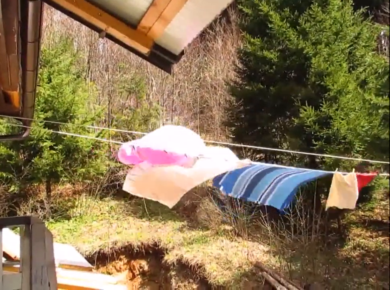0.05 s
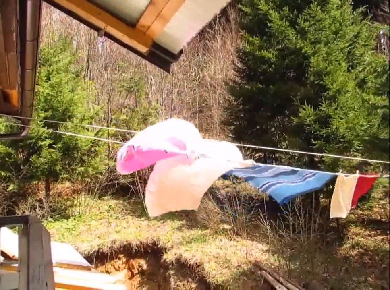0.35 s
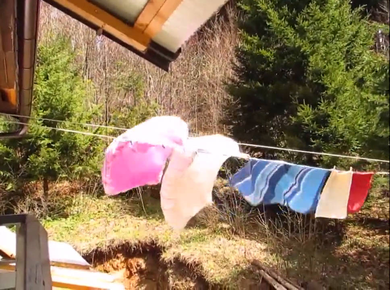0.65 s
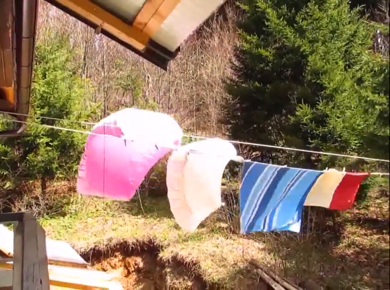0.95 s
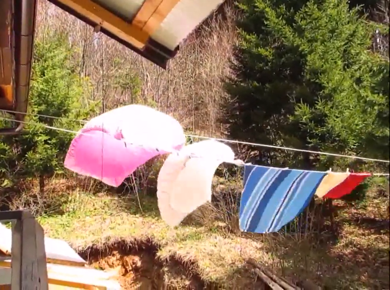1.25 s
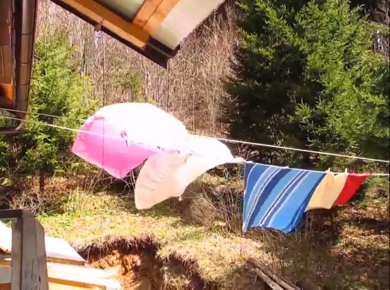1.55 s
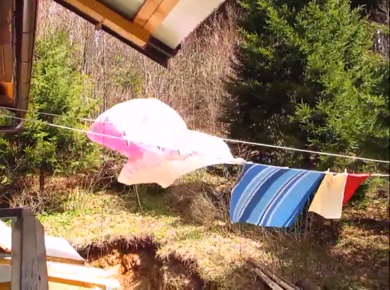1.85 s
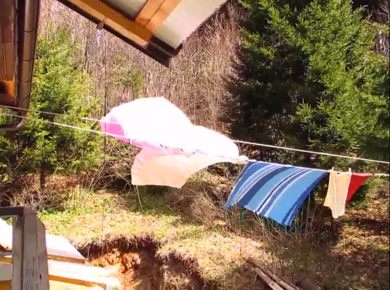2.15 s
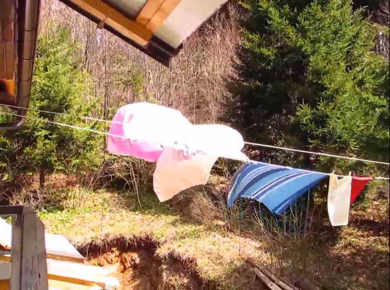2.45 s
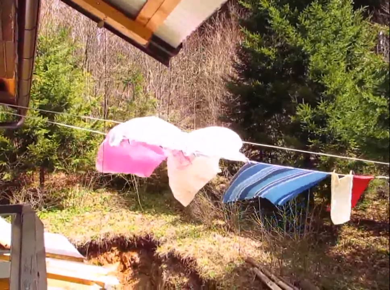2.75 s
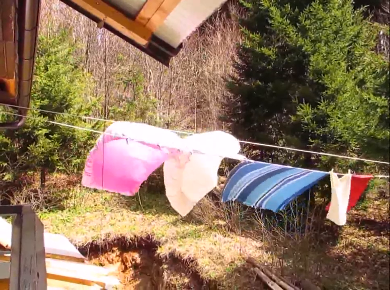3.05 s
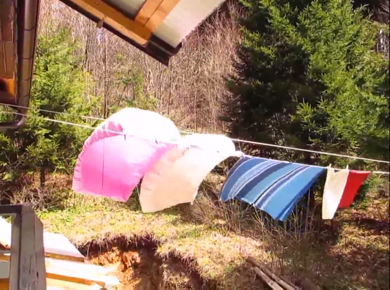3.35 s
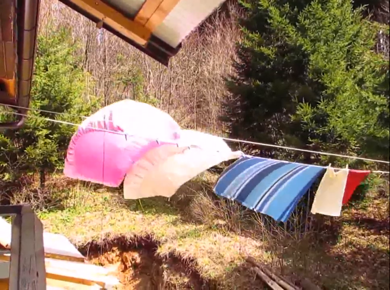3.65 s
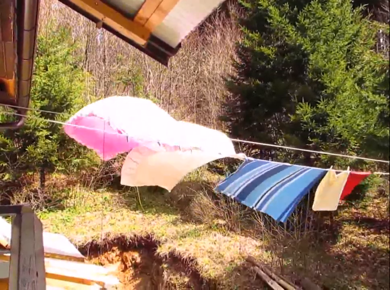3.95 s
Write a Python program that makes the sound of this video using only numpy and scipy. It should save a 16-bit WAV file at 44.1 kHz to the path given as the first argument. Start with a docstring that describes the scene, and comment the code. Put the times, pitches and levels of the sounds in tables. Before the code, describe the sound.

Wind buffets the microphone in uneven clusters of low thumps and rumble, hardest around the middle and at the very end. Beyond an open yard, trees rush softly and steadily while small birds whistle faintly far off.

```python
"""Wind buffeting a stereo microphone in a yard at the edge of a wood.
Eddies strike the ports in clusters of hard thumps, over a restless low rumble of turbulence.
Beyond the yard the crowns of the trees roar steadily and their needles hiss.
Far off, small birds whistle and the trunks echo them. The microphone adds a faint electrical whine."""
import sys
import numpy as np
from scipy import signal
from scipy.io import wavfile

SR = 44100
rng = np.random.default_rng(int(sys.argv[2]) if len(sys.argv) > 2 else 0)


def wav_record(signal):
    """Record a signal, one row per channel, as 16-bit PCM in the file named by sys.argv[1]."""
    frames = np.transpose(np.atleast_2d(signal))
    bounded = np.clip(frames, -1, 1)
    # unit amplitude maps onto the largest positive 16-bit level
    quanta = np.round(bounded * 32767).astype(np.int16)
    wavfile.write(sys.argv[1], SR, quanta)


N = 176400
T = np.arange(N) / SR
CUTOFF_HZ = 15900   # top of the microphone's range


# Eddies right on the microphone: peak_s, relative_level_db, pitch_hz, length_s, right_port_lag_s
EDDY_HITS = [(0.095, -26.5, 106.7, 0.054, -0.0001), (0.133, -19.5, 93, 0.015, 0.0003),
             (0.239, -21.5, 98.8, 0.049, -0.0003), (0.599, -21, 95, 0.03, -0.0004),
             (0.624, -20, 110, 0.0073, -0.0002), (0.656, -17, 102.5, 0.04, -0.0009),
             (0.677, -19, 92, 0.013, -0.0003), (0.703, -23.5, 96, 0.0061, -0.0018),
             (0.717, -26, 85, 0.0072, 0.0008), (0.774, -34, 109, 0.012, -0.001),
             (0.85, -17, 112.6, 0.015, -0.0008), (1.175, -27, 119, 0.022, 0.0005),
             (1.285, -11.5, 107, 0.014, 0.0011), (1.338, -18, 104, 0.028, -0.0009),
             (1.382, -24, 102, 0.0048, 0.0007), (1.405, -11, 121, 0.0038, -0.001),
             (1.43, -11.5, 162, 0.02, -0.0011), (1.518, -43, 110, 0.02, 0.0001),
             (1.579, -20.5, 178, 0.021, 0.0012), (1.629, -20, 96.3, 0.029, 0.0003),
             (1.742, -23.5, 132, 0.027, 0.0013), (2.033, -13, 102, 0.009, 0.0001),
             (2.088, -11, 126, 0.016, -0.0007), (2.14, -2.5, 210, 0.011, -0.0012),
             (2.158, -4, 179, 0.0071, -0.0015), (2.193, -13.5, 126.6, 0.038, -0.0015),
             (2.211, -13.5, 113.2, 0.017, -0.0007), (2.262, -19, 123, 0.0075, -0.0014),
             (2.289, -13.5, 282, 0.016, 0.0012), (2.308, -14, 208, 0.0077, 0.0012),
             (2.359, -16.5, 121, 0.013, -0.0016), (2.752, -24, 139, 0.015, -0.0011),
             (2.794, -29.5, 96.7, 0.052, -0.0002), (2.923, -31.5, 122, 0.016, 0.0002),
             (2.943, -26.5, 108, 0.03, -0.0011), (3.005, -27.5, 133, 0.032, 0.0005),
             (3.128, -15.5, 112.5, 0.037, -0.0001), (3.141, -21.5, 190, 0.015, -0.0009),
             (3.289, -12.5, 139, 0.02, -0.0011), (3.349, -16.5, 99, 0.021, -0.0005),
             (3.38, -33, 105, 0.0094, -0.0001), (3.418, -22, 92, 0.018, -0.0012),
             (3.493, -21, 110, 0.0068, -0.0016), (3.551, -21.5, 117.4, 0.051, -0.0011),
             (3.63, -24, 96.5, 0.024, -0.0), (3.707, -27, 86, 0.041, -0.0002),
             (3.8, -22, 82, 0.019, -0.0005), (3.927, 1, 124.4, 0.013, 0.0009),
             (3.947, -10, 133, 0.012, 0.0012), (3.985, -14.5, 140, 0.03, 0.0016)]

def buffets(gain_db=-3):
    """Each eddy sweeps over one port and, a moment later, over the other."""
    half = SR // 12
    t = np.arange(-half, half) / SR
    out = np.zeros((2, N + SR))
    for peak_s, level_db, pitch_hz, length_s, lag_s in EDDY_HITS:
        pressure = from_db(level_db + gain_db) * eddy(t, pitch_hz, length_s)
        left = np.interp(t + lag_s / 2, t, pressure)
        right = np.interp(t - lag_s / 2, t, pressure)
        at = int(peak_s * SR)
        out[:, at:at + 2 * half] += [left, right]
    return out[:, half:half + N]


def eddy(t, pitch_hz, length_s, push_hz=62.8, push_s=0.026, whirl_top_hz=597):
    """A few uneven pressure swings on a slow push of air, ragged with small whirls."""
    window = swell(t, length_s)
    wander = unit_rms(band(rng.standard_normal(len(t)), pitch_hz / 5, pitch_hz))
    wander -= np.average(wander, weights=window ** 2)
    turns = np.cumsum(pitch_hz * np.exp(0.29 * wander)) / SR
    phase = rng.random()
    swings = window * np.sin(2 * np.pi * (phase + turns - turns[len(t) // 2]))
    push_gain = from_db(3) * (push_hz / pitch_hz) ** 1.8   # faster eddies push less
    push = push_gain * swell(t, push_s) * np.sin(2 * np.pi * (phase + push_hz * t))
    whirls = band(rng.standard_normal(len(t)), 1.04 * pitch_hz, 2.69 * pitch_hz)
    whirls = signal.sosfilt(signal.butter(6, whirl_top_hz, fs=SR, output="sos"), whirls)
    whirls = unit_rms(window * whirls) * np.sqrt(np.mean(window ** 2))
    return swings + push + from_db(-16) * whirls


# Turbulence at the microphone, between the buffets: time_s, relative_level_db
RUMBLE_LEVEL = [(0.0, -29), (0.13, -46), (0.32, -47.5), (0.6, -57), (0.75, -37), (0.95, -45), (1.21, -48),
                (1.41, -23.5), (1.49, -30.5), (1.79, -45), (2.04, -35), (2.19, -28), (2.35, -38.5),
                (2.57, -43), (2.85, -39), (3.19, -41), (3.33, -26), (3.45, -38.5), (3.73, -37), (4.0, -38)]
# Its tone, heavy in the bass: frequency_hz, relative_density_db
RUMBLE_SPECTRUM = [(25, -24), (45, 0), (70, 1.5), (105, -1), (160, -9.5), (250, -19.5), (400, -30),
                   (800, -37)]
# How alike it is at the left and right ports: frequency_hz, correlation
RUMBLE_CORRELATION = [(50, 1), (100, 0.95), (200, 0.0035), (400, 0.18)]

def rumble(gain_db=2.5, lumps_db=5, lumps_hz=25.5):
    """Lumpy low turbulence on the microphone ports."""
    noise = air_noise(RUMBLE_SPECTRUM, RUMBLE_CORRELATION, low_hz=22.46, high_hz=810, bands=10,
                      flicker_db=0.5, flicker_hz=4.5)
    lumps = from_db(lumps_db * drift(lumps_hz))
    return from_db(gain_db + in_time(RUMBLE_LEVEL)) * unit_rms(noise * lumps)


# Wind in the crowns, heard from the yard: time_s, relative_level_db
ROAR_LEVEL = [(0.0, -44), (0.65, -41.5), (0.96, -40.5), (1.85, -40.5), (2.22, -42), (3.12, -41),
              (3.6, -40.5), (4.0, -41.5)]
# Tone of the crowns at that distance: frequency_hz, relative_density_db
ROAR_SPECTRUM = [(170, -1), (300, 1.5), (450, 1.5), (650, 2.5), (900, 4), (1200, 0.5), (1700, -5),
                 (2400, -13), (3500, -18), (4800, -27)]
# Wind through the needles: time_s, relative_level_db
HISS_LEVEL = [(0.0, -72), (0.22, -71.5), (1.15, -67), (2.04, -67.5), (3.72, -67), (4.0, -69)]
# Tone of the needles: frequency_hz, relative_density_db
HISS_SPECTRUM = [(4800, -8.5), (6500, -9), (9000, -9.5), (12000, -14.5), (15500, -19)]
# How alike the trees sound left and right: frequency_hz, correlation
TREES_CORRELATION = [(150, .7), (380, 0.82), (700, 0.85), (1300, 0.89), (2400, 0.93), (4400, 0.74),
                     (8000, 0.14), (15000, 0.2)]
# Where they sit in front of the microphone: frequency_hz, left_minus_right_db
TREES_BALANCE = [(200, -2), (640, 3.5), (1400, 0.9), (3100, 0.4), (6800, 1.4), (15000, 0)]

def trees(roar_db=-0.5, hiss_db=4, split_hz=4766):
    """Broad roar of the crowns and fine hiss of the needles, both swelling with the wind."""
    roar = air_noise(ROAR_SPECTRUM, TREES_CORRELATION, low_hz=153.4, high_hz=split_hz, bands=14,
                     flicker_db=0.61, flicker_hz=2.9, balance=TREES_BALANCE)
    hiss = air_noise(HISS_SPECTRUM, TREES_CORRELATION, low_hz=split_hz, high_hz=CUTOFF_HZ, bands=5,
                     flicker_db=0.5, flicker_hz=9, balance=TREES_BALANCE)
    roar *= from_db(roar_db + in_time(ROAR_LEVEL))
    hiss *= from_db(hiss_db + in_time(HISS_LEVEL))
    return roar + hiss


# Small birds far off in the wood:
# start_s, length_s, start_pitch_hz, end_pitch_hz, relative_level_db, warble_depth_hz
BIRD_NOTES = [(0.782, 0.16, 3700, 3830, -57.5, 330), (.85, 0.072, 7050, 7200, -63, 100),
              (.936, 0.059, 7545, 7535, -56, 18), (0.981, 0.14, 6850, 6840, -54.5, 150),
              (1.1, 0.11, 7270, 7230, -51, 18), (1.126, 0.1, 7080, 6880, -68, 130),
              (1.244, 0.036, 4050, 3934, -51.5, 39), (1.299, .06, 4043, 3850, -50.5, 14),
              (1.463, .04, 3970, 4020, -59, 13), (1.72, 0.16, 8310, 8080, -59, 51),
              (1.904, 0.18, 8030, 7880, -55.5, 25), (2.041, 0.083, 8040, 8080, -58, 140),
              (2.165, 0.077, 8280, 8390, -57.5, 36), (2.259, 0.12, 4040, 4030, -51, 62),
              (2.341, 0.22, 3740, 3610, -50.5, 400), (2.37, .16, 4140, 3960, -58, 87),
              (2.45, 0.16, 5040, 5290, -59, 283), (2.61, .15, 4520, 4580, -58, 140),
              (2.66, 0.094, 4010, 3970, -53, 170)]

def birds(direct_db=-5.5, echo_db=-3.5, wood_t60_s=1):
    """Thin warbling whistles, smeared by echoes among the trunks on their way to the yard."""
    song = np.zeros(N)
    warble = drift(rate_hz=150)
    for start_s, length_s, start_hz, end_hz, level_db, depth_hz in BIRD_NOTES:
        on = (T >= start_s) & (T < start_s + length_s)
        progress = (T[on] - start_s) / length_s
        pitch_hz = start_hz + (end_hz - start_hz) * progress + depth_hz * warble[on]
        envelope = from_db(level_db) * np.sqrt(2 * np.sin(np.pi * progress))
        song[on] += envelope * np.sin(2 * np.pi * np.cumsum(pitch_hz) / SR)
    trunks = rng.standard_normal((2, SR)) * from_db(-60 * T[:SR] / wood_t60_s)
    echo = signal.fftconvolve(song[None], unit_rms(trunks) / np.sqrt(SR), axes=1)[:, :N]
    return from_db(direct_db) * song + from_db(echo_db) * echo


def air_noise(spectrum, correlation, low_hz, high_hz, bands, flicker_db, flicker_hz, balance=None):
    """Rushing air: bands of stereo noise, each with its own level, flicker, width and side; rms 1."""
    edges = np.geomspace(low_hz, high_hz, bands + 1)
    flip = np.array([[1], [-1]])   # left up, right down
    white = rng.standard_normal((2, 2, N))
    out = np.zeros((2, N))
    for k, (low, high) in enumerate(zip(edges, edges[1:])):
        mid, side = band(white[k % 2], low, high)   # neighbouring bands take independent noise
        centre_hz = np.sqrt(low * high)
        alike = np.clip(at_hz(correlation, centre_hz), -1, 1)
        stereo = np.sqrt(1 + alike) * mid + np.sqrt(1 - alike) * side * flip
        pan = from_db(flip * at_hz(balance, centre_hz) / 2) if balance else 1
        gain = from_db(at_hz(spectrum, centre_hz) + flicker_db * drift(flicker_hz))
        out += pan * gain * stereo
    return unit_rms(out)


def drift(rate_hz):
    """A smooth random curve of rms about 1, moving mostly slower than rate_hz."""
    hop, settle = 40, 2000   # samples per step; steps for the filter to settle
    pole = np.exp(-2 * np.pi * rate_hz * hop / SR)
    white = rng.standard_normal(N // hop + settle + 2)
    slow = signal.lfilter([1], [1, -2 * pole, pole * pole], white)[settle:]
    return np.interp(np.arange(N) / hop, np.arange(len(slow)), unit_rms(slow))


def swell(t, length_s):
    """A smooth rise and fall around time zero, about length_s wide at half height."""
    return 1 / np.cosh(np.clip(2.5 * t / length_s, -20, 20))


def band(x, low_hz, high_hz):
    """Gentle band-pass."""
    edges = [max(low_hz, 10), min(high_hz, 0.45 * SR)]
    return signal.sosfilt(signal.butter(2, edges, "band", fs=SR, output="sos"), x)


def in_time(rows):
    """Read a table at every sample."""
    return np.interp(T, *np.transpose(rows))


def at_hz(rows, hz):
    """Read a table on a log-frequency axis."""
    frequencies, values = np.transpose(rows)
    return np.interp(np.log(hz), np.log(frequencies), values)


def from_db(db):
    """Decibels to gain."""
    return 10 ** (np.asarray(db) / 20)


def unit_rms(x):
    """Scale to unit power."""
    return x / np.sqrt(np.mean(x ** 2) + 1e-20)


def scene():
    """The wood as heard from the yard, with the wind on the microphone in front of it all."""
    return trees() + birds() + rumble() + buffets()


def record(dry, low_cut_hz=32, whine_hz=15734, whine_db=-74):
    """The microphone sheds deep bass, adds a faint whine, overloads at full scale and cuts the top."""
    x = signal.sosfilt(signal.butter(2, low_cut_hz, "high", fs=SR, output="sos"), dry)
    x += from_db(whine_db) * np.sqrt(2) * np.sin(2 * np.pi * whine_hz * T)
    x = x / (1 + x ** 8) ** (1 / 8)   # soft clipping
    return signal.sosfilt(signal.ellip(12, 0.1, 80, CUTOFF_HZ, fs=SR, output="sos"), x)


dry = scene()
out = record(dry)
wav_record(out)
```